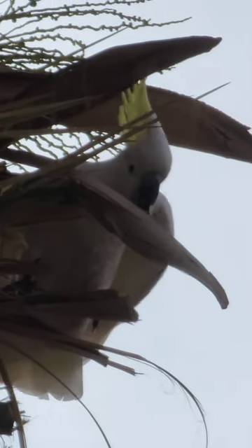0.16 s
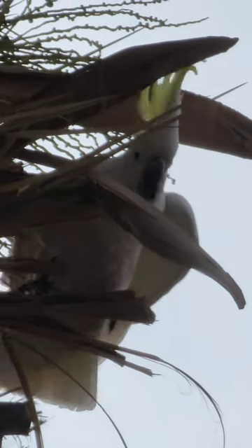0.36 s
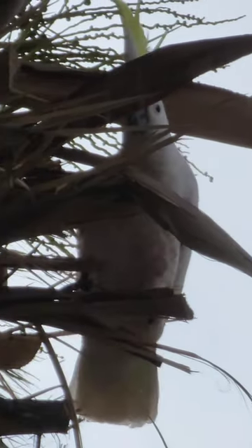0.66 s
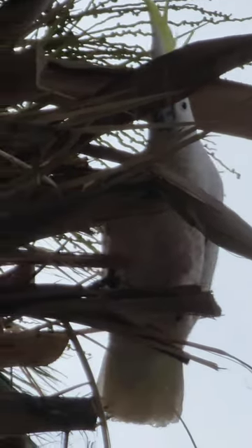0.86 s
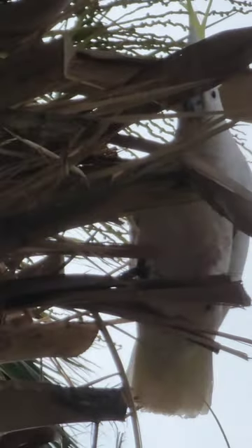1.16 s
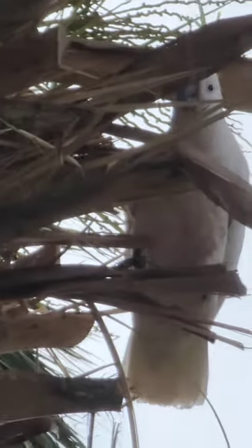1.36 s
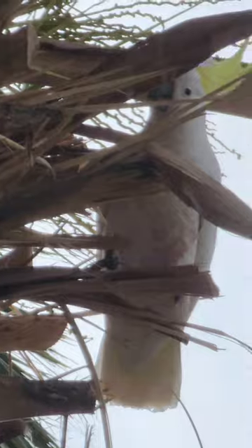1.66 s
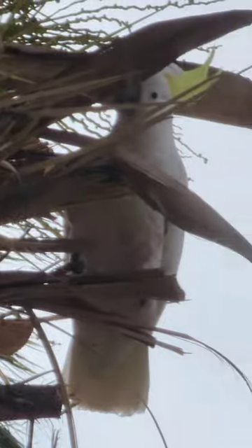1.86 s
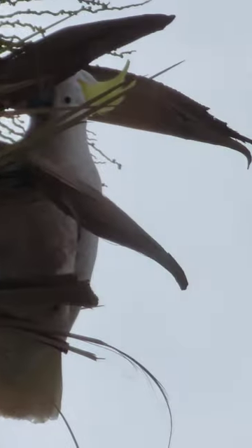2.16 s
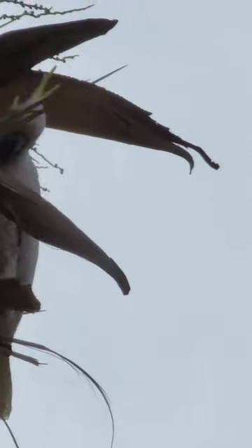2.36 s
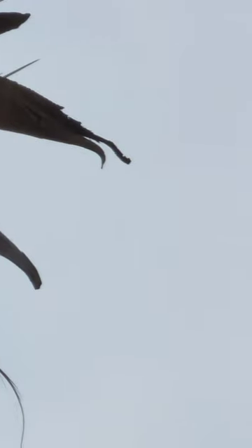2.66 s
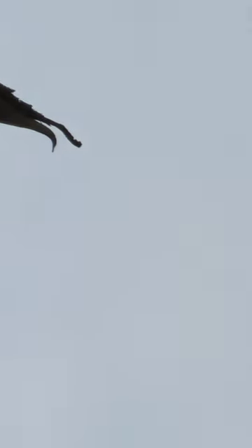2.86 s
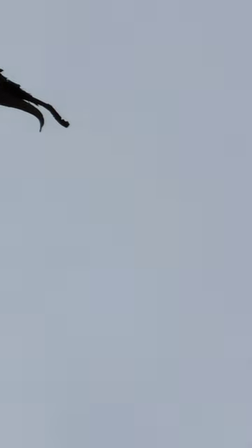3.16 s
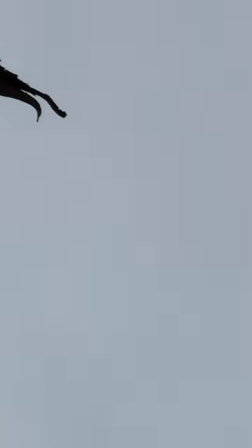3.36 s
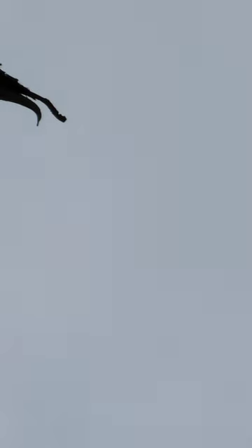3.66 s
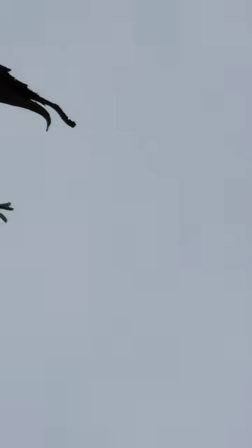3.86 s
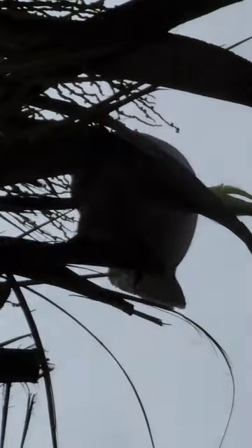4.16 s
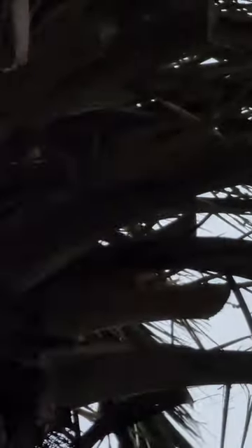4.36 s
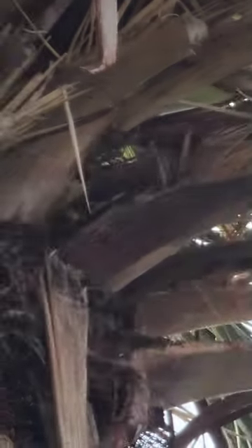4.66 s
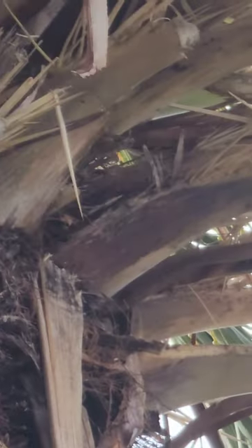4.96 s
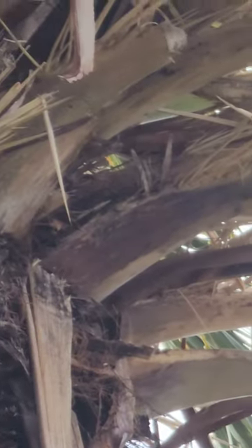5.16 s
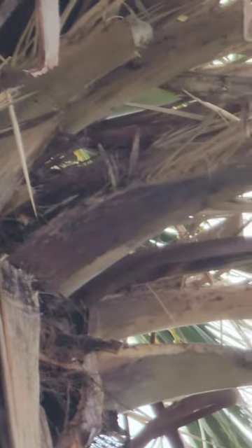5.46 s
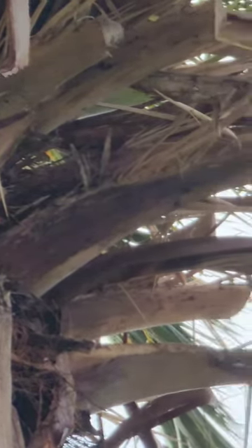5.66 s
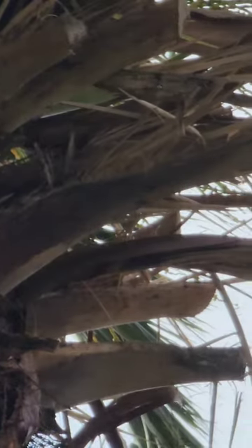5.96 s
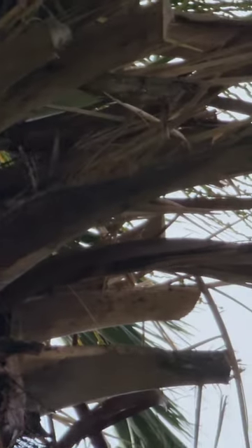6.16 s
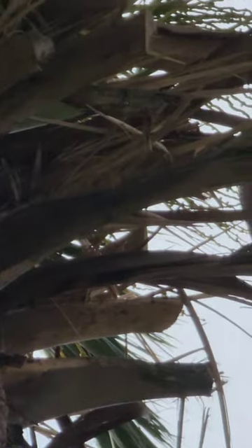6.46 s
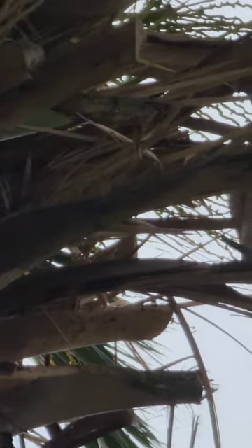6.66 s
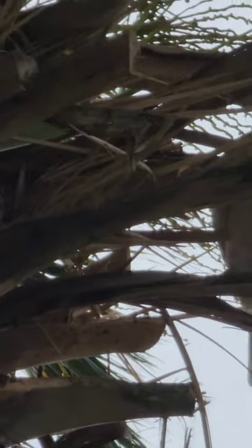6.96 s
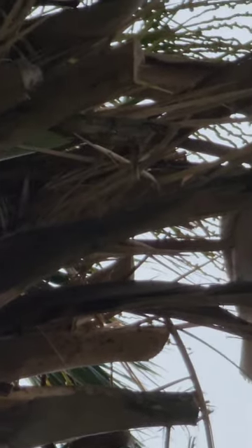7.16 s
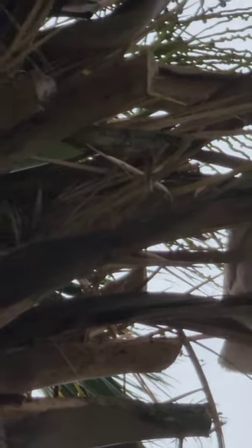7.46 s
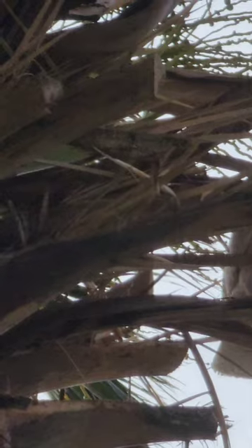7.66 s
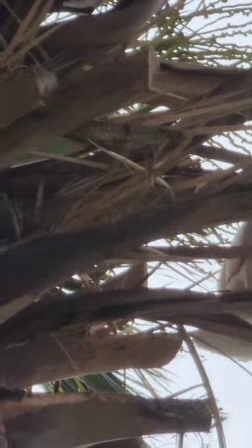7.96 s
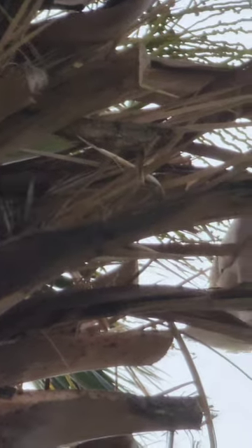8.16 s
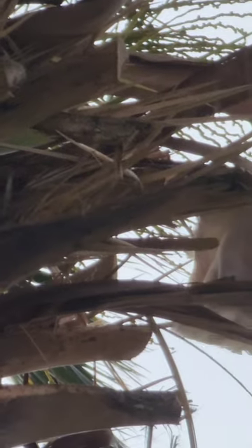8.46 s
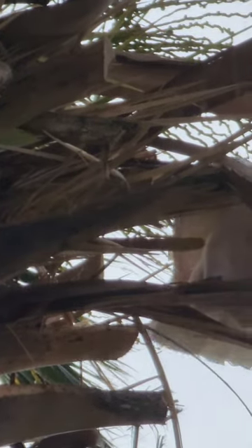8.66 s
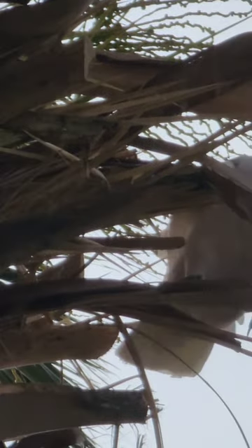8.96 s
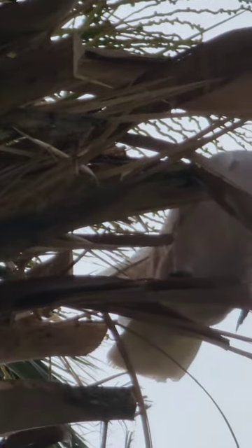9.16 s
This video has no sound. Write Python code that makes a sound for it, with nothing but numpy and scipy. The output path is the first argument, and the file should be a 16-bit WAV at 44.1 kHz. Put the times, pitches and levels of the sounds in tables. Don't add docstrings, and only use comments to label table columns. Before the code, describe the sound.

Several cockatoos give loud, harsh, rasping screeches one after another outdoors, with fainter answering calls further off over low wind rumble and distant traffic.

```python
import sys
import numpy as np
from scipy import signal
from scipy.fft import rfft, irfft, next_fast_len
from scipy.io import wavfile
from scipy.ndimage import uniform_filter1d

SR = 44100
rng = np.random.default_rng(int(sys.argv[2]) if len(sys.argv) > 2 else 0)


def invert_db(x):
    u = np.asarray(x, float) / 20
    return 10 ** u


def waveform_to_disk(signal):
    frames = np.transpose(np.atleast_2d(signal))
    scaled = np.clip(frames, -1, 1) * 32767
    samples = np.round(scaled).astype(np.int16)
    wavfile.write(sys.argv[1], SR, samples)


N = 411012
TOP_HZ = 15400

# start in seconds, length in seconds,
# phase scatter in radians (small is a clean whistle).
NEAR_CALM_SPELLS = [(.14, .085, .08), (3.63, .12, .55), (3.78, .17, .7), (3.99, .16, .15), (4.43, .05, .35),
                    (4.49, .06, .5), (4.56, .048, .05), (7.24, .21, .44), (8.49, .08, .5),
                    (8.58, .062, .05)]
# start in seconds, length in seconds, level in dB,
# swell in seconds, fade in seconds.
NEAR_SCREECHES = [
    (.04, 0.58, -12, 0.08, 0.051),
    (4.425, 0.61, -11.5, .03, 0.076),
    (8.46, 0.66, -11.5, 0.059, 0.069),
]
# time in seconds, pitch in Hz.
NEAR_GLIDES = [
    [(.04, 960.6), (.14, 1008), (.235, 1110), (.3, 1149), (.6, 1140)],
    [(4.42, 990.4), (4.52, 1047), (4.6, 1098), (4.7, 1110), (5.0, 1188)],
    [(8.47, 1040), (8.57, 1045), (8.645, 1147), (9.1, 1139)],
]
# frequency in Hz, density in dB per Hz.
NEAR_TRACT = [(290, -59.5), (500, -18), (801, -16.5), (873, -21.5), (1100, -12.5), (1400, -15), (1840, -13),
              (2240, -10), (3450, -15), (4100, -15.5), (5400, -12), (6300, -17.5), (7700, -17.5),
              (10100, -31.5), (15200, -30.5)]


def nearest_bird():
    return screeches(NEAR_SCREECHES, NEAR_GLIDES, NEAR_CALM_SPELLS, NEAR_TRACT, rasp_rad=.67, ring=0.45,
                     beak_db=-0.5, beak_rise_db=11.5, low_db=-15.5, hiss_db=-11)


# start in seconds, length in seconds, level in dB,
# swell in seconds, fade in seconds.
MATE_SCREECHES = [
    (7.18, .63, -11, 0.062, 0.071),
]
# time in seconds, pitch in Hz.
MATE_GLIDES = [
    [(7.2, 1050), (7.42, 1125), (7.47, 1163), (7.6, 1199), (7.72, 1161), (7.8, 1050)],
]


def darker_mate():
    return screeches(MATE_SCREECHES, MATE_GLIDES, NEAR_CALM_SPELLS, NEAR_TRACT, rasp_rad=.67, ring=0.55,
                     beak_db=-7, beak_rise_db=10.5, low_db=-18, hiss_db=-14.5)


# start in seconds, length in seconds, level in dB,
# swell in seconds, fade in seconds.
DEEP_SCREECHES = [
    (3.575, 0.566, -11.5, 0.22, 0.097),
]
# time in seconds, pitch in Hz.
DEEP_GLIDES = [
    [(3.62, 800), (3.72, 916), (3.82, 934.6), (3.9, 1000), (3.97, 1002), (4.068, 900), (4.13, 785)],
]
# frequency in Hz, density in dB per Hz.
DEEP_TRACT = [(290, -47.5), (500, -10), (746, -11), (1080, -1.5), (1360, -7), (1550, -9), (1970, -7),
              (2990, -7.5), (4210, -16), (4860, -9.5), (9780, -28.5), (14600, -34.5), (15200, -52.5)]


def deep_neighbour():
    return screeches(DEEP_SCREECHES, DEEP_GLIDES, NEAR_CALM_SPELLS, DEEP_TRACT, rasp_rad=.92, ring=3.2,
                     beak_db=-6, beak_rise_db=8, low_db=-17, hiss_db=-10)


# start in seconds, length in seconds, level in dB,
# swell in seconds, fade in seconds.
HOARSE_SCREECHES = [
    (2.55, 0.55, -13, 0.19, 0.068),
]
# time in seconds, pitch in Hz.
HOARSE_GLIDES = [
    [(2.6, 992.4), (3.1, 1082)],
]


def hoarse_bird():
    return screeches(HOARSE_SCREECHES, HOARSE_GLIDES, NEAR_CALM_SPELLS, DEEP_TRACT, rasp_rad=.92, ring=2.1,
                     beak_db=-2, beak_rise_db=3, low_db=-15.5, hiss_db=-17)


# start in seconds, length in seconds, start pitch in Hz,
# end pitch in Hz, level in dB.
VOICE_CATCHES = [
    (7.17, 0.18, 980, 2000, -18.5),
    (7.22, 0.082, 1560, 1480, -17),
    (7.19, 0.13, 2600, 2200, -12),
    (7.725, 0.03, 640, 590, -23.5),
    (7.72, 0.081, 2400, 2200, -13.5),
    (7.26, .19, 1080, 1130, -18.5),
    (3.62, 0.048, 2000, 1300, -21),
]


def voice_catches():
    return whistles(VOICE_CATCHES, .025)


# start in seconds, length in seconds, level in dB,
# swell in seconds, fade in seconds.
FAR_SCREECHES = [(0, .09, -27.5, 0.0033, 0.027), (.56, .62, -26.5, 0.056, 0.22),
                 (1.13, 0.52, -37.5, 0.085, .45), (2.02, 0.64, -59, 0.066, 0.069),
                 (3.23, 0.33, -47, 0.085, .15), (4.08, .4, -28, 0.034, .04), (6.3, 0.347, -36, 0.21, 0.17),
                 (6.66, .14, -41, 0.057, .04), (6.76, .26, -41.5, .04, 0.036),
                 (6.93, 0.35, -39, 0.087, 0.0384), (7.9, .62, -26, .4, .05)]
# time in seconds, pitch in Hz.
FAR_GLIDES = [
    [(0, 1040), (.09, 970)],
    [(.6, 1110), (1.15, 1000)],
    [(1.15, 1000), (1.4, 1100)],
    [(2.05, 1000), (2.5, 1050)],
    [(3.27, 787), (3.45, 745)],
    [(4.1, 950), (4.45, 1000)],
    [(6.35, 1440), (6.6, 1490)],
    [(6.68, 1000), (6.78, 1030)],
    [(6.77, 1370), (7.0, 1350)],
    [(7.0, 1250), (7.15, 1140)],
    [(7.95, 1030), (8.12, 1090)],
]
# start in seconds, length in seconds,
# phase scatter in radians.
FAR_CALM_SPELLS = [(.62, .3, .7), (1.19, .5, .55), (6.76, .23, .25), (7.03, .2, .65), (7.97, .16, .45),
                   (8.15, .3, .62)]
# frequency in Hz, density in dB per Hz.
FAR_TRACT = [(350, -66.5), (600, -18.5), (715, -11), (925, -18), (1090, -15), (1660, -16.5), (2230, -12.5),
             (2960, -0.5), (3780, -13.5), (5600, -20), (15200, -42.5)]


def far_flock():
    return screeches(FAR_SCREECHES, FAR_GLIDES, FAR_CALM_SPELLS, FAR_TRACT, rasp_rad=.8, ring=0.36,
                     beak_db=5, beak_rise_db=-0.5, low_db=-14, hiss_db=-21)


# lower edge in Hz, upper edge in Hz.
VOICE_BANDS = ((1400, 2400), (450, 1400), (2400, 3700), (3700, 9200), (9200, 15300))


def screeches(calls, glides, calm_spells, tract, rasp_rad, ring, beak_db, beak_rise_db, low_db, hiss_db):
    tiring_rad, calm_edge_s, low_joins_s = .17, .013, .11
    out = np.zeros(N)
    for (start, length, db, swell, fade), glide in zip(calls, glides):
        at = np.arange(int(start * SR), min(int((start + length) * SR), N))
        t, count = at / SR, len(at)
        along = (t - start) / length

        full = rasp_rad + tiring_rad * along
        chaos = full.copy()
        for s, span, rad in calm_spells:
            inside_s = np.minimum(t - s, s + span - t)
            chaos += (rad - chaos) * np.clip(1 + inside_s / calm_edge_s, 0, 1)
        clean = 1 - chaos / full
        rising = np.clip(1 - (t - start) / swell, 0, 1)
        dying = np.clip(1 - (start + length - t) / fade, 0, 1)

        wander = .045 * chaos ** 2 * np.tanh(walk(28, count))
        hz = np.interp(t, *np.transpose(glide)) * (1 + wander)
        voice = shape(syrinx(hz, chaos, ring), tract)
        throat, low, beak, rasp, hiss = (steady(band(voice, *edges)) for edges in VOICE_BANDS)

        gape_db = beak_db + beak_rise_db * along - 7 * rising - 11 * clean + 3 * dying
        gape_db += 4 * chaos * np.tanh(walk(22, count))
        beak_gain, rasp_gain = invert_db(gape_db), invert_db(-6 + 0.8 * gape_db)
        rasp = rasp + invert_db(hiss_db - 8.5 * clean) * hiss
        voice = throat + beak_gain * beak + rasp_gain * rasp
        voice /= np.sqrt(1 + beak_gain ** 2 + rasp_gain ** 2)

        late_db = -11 * np.clip(1 - (t - start) / low_joins_s, 0, 1) ** .5
        flutter_db = 5 * chaos * np.tanh(walk(20, count))
        voice += invert_db(low_db + 6.5 * clean ** 2 + late_db + flutter_db) * low

        level_db = db - 24 * rising ** 2 - 25 * dying ** 1.12 + 1.43 * clean
        ends = np.clip(4 - 4 * np.maximum(rising, dying), 0, 1)
        out[at] += ends * invert_db(level_db) * voice
    return out


def syrinx(hz, chaos, ring):
    count = len(hz)
    cycle = 2 * np.pi * np.cumsum(hz * (1 + .025 * chaos * walk(80, count))) / SR
    cycle += 1.2 * chaos ** 2 * walk(260, count)
    phase = cycle + 0.91 * chaos * walk(1500, count)
    order = np.clip(1 - chaos, 0, 1)
    puffs = np.zeros(count)
    for k in range(1, 20):
        puffs += np.cos(k * phase) * np.exp(-.2 * order * k) * (k * hz < TOP_HZ)
    puffs += ring * order * np.cos(2 * cycle) * invert_db(2.4 * chaos * walk(120, count))
    breath = .6 * chaos * rng.standard_normal(count)
    return puffs * invert_db(1.37 * chaos * walk(300, count)) + breath


# start in seconds, length in
# seconds, start pitch in Hz, end pitch in Hz, level in dB.
TONES_AND_CHIRPS = [(1.2, 0.18, 2040, 2220, -42), (.98, .2, 1920, 1900, -40), (1.36, 0.17, 3320, 3230, -48),
                    (1.98, 0.23, 4330, 4280, -60.5), (2.42, 0.092, 5400, 5360, -52.5),
                    (2.44, .05, 8100, 8100, -69), (2.3, .08, 4730, 4760, -63), (3.24, .14, 1503, 1355, -39),
                    (3.25, 0.16, 780, 674, -43.5), (3.28, 0.23, 5300, 5300, -58.5),
                    (3.33, .13, 3850, 3750, -54.5), (3.32, 0.093, 3130, 2890, -35.5),
                    (5.69, 0.12, 4370, 4300, -69), (5.81, .05, 4820, 4950, -68.5),
                    (6.04, 0.075, 3800, 3800, -64), (6.38, .08, 1450, 1500, -44),
                    (6.655, 0.116, 3060, 3027, -33), (6.75, 0.24, 1360, 1360, -32.5),
                    (6.81, 0.15, 5400, 5450, -51), (7.99, .14, 2060, 2200, -34), (8.15, .3, 2170, 2150, -37.5),
                    (7.05, .15, 2394, 2250, -40)]
# start in seconds, length in seconds, start pitch in Hz, end pitch in Hz,
# level in dB.
SCRATCHY_TICKS = [
    (2.05, 0.035, 6350, 5600, -56),
    (2.295, .04, 6300, 6160, -53.5),
    (2.47, 0.12, 6300, 6200, -55),
    (6.268, .04, 6200, 6000, -51),
    (6.71, 0.071, 2250, 1890, -32),
]


def far_tones_and_ticks():
    return whistles(TONES_AND_CHIRPS, .012) + whistles(SCRATCHY_TICKS, .1)


def whistles(table, wobble):
    out = np.zeros(N)
    for s, length, from_hz, to_hz, db in table:
        count = int(length * SR)
        glide = from_hz + (to_hz - from_hz) * np.linspace(0, 1, count) ** 2
        hz = glide * (1 + wobble * walk(700, count))
        swell = invert_db(db + 2 * walk(80, count)) * signal.windows.tukey(count, .6)
        first = int(s * SR)
        out[first:first + count] += swell * np.sin(2 * np.pi * np.cumsum(hz) / SR)
    return out


# left delay in seconds, right delay in seconds, gain as a ratio.
CLOSE_ECHOES = [
    (.00627, .00627, -.4),
    (.00196, .00126, .25),
    (.00158, .00158, -.2),
    (.00255, .00255, .15),
    (.00831, .00829, .2),
    (.00373, .01149, -.15),
]


def grove(x, pan_db, echo_share, frond_db, tail_db, t60_s):
    answer = scatter(frond_db, 0.1, 0.00063, 1900, 0.15)
    answer += scatter(tail_db, t60_s, 0.0068, 500, 0.6)
    answer[[0, 1], [0, 1]] += 1
    for left_s, right_s, gain in CLOSE_ECHOES:
        answer[[0, 1], [int(left_s * SR), int(right_s * SR)]] += echo_share * gain
    pan = invert_db(np.array([[pan_db], [-pan_db]]) / 2)
    answer *= pan / np.sqrt(np.sum(answer ** 2, axis=1, keepdims=True))
    return signal.fftconvolve(x[None], answer, axes=1)[:, :N]


def scatter(db, t60_s, rise_s, apart_hz, dull):
    t = np.arange(SR) / SR
    decay = invert_db(-60 * t / t60_s) * (1 - np.exp(-t / rise_s))
    mid, side = rng.standard_normal((2, SR)) * decay
    side = signal.lfilter(*signal.butter(1, apart_hz, "high", fs=SR), side)
    cloud = signal.lfilter([1], [1, -np.clip(dull, 0, .9)], [mid + side, mid - side])
    return invert_db(db) * cloud / np.sqrt(np.mean(np.sum(cloud ** 2, axis=1)))


# time in seconds, rumble level in dB.
RUMBLE_LEVELS = [(0.0, -36.5), (4.38, -35.5), (4.78, -44), (4.91, -35.5), (7.53, -40), (7.74, -45),
                 (7.79, -37), (8.62, -31.5), (8.77, -42.5), (9.22, -32.5), (9.27, -46), (9.32, -37)]
# frequency in Hz, density in dB per Hz.
AIR_SPECTRUM = [(11, -43.5), (18, -36.5), (48, 6.5), (87, -3), (123, -3.5), (198, -21), (302, -21),
                (546, -30.5), (934, -26.5), (1470, -26.5), (2300, -32.5), (2730, -45.5), (3140, -43.5),
                (7120, -74), (15200, -83)]
# frequency in Hz, side minus mid in dB.
AIR_WIDTH = [(60, -17.5), (110, -18), (200, -21), (380, -8.5), (690, -7), (1280, -1.5), (2360, -0.5),
             (4350, 2), (8020, -5.5), (14800, -3)]


def wind_and_traffic():
    mid = shape(rng.standard_normal(N), AIR_SPECTRUM)
    side = shape(shape(rng.standard_normal(N), AIR_SPECTRUM), AIR_WIDTH)
    pair = np.array([mid + side, mid - side])
    rumble, hiss = band(pair, 15, 190), band(pair, 190, 15300)
    rumble_db = np.interp(np.arange(N) / SR, *np.transpose(RUMBLE_LEVELS)) + 2.2 * walk(5.1, N)
    traffic_db = -43 + 1.0 * walk(1.0, N)
    return rumble / rumble.std() * invert_db(rumble_db) + hiss / hiss.std() * invert_db(traffic_db)


def shape(x, table):
    size = next_fast_len(len(x))
    hz, db = np.transpose(table)
    bins_hz = np.arange(size // 2 + 1) * SR / size
    gain = invert_db(np.interp(np.log(bins_hz + 1), np.log(hz), db))
    return irfft(rfft(x, size) * gain, size)[:len(x)]


def band(x, lo_hz, hi_hz):
    return signal.sosfilt(signal.butter(4, [lo_hz, hi_hz], "bandpass", fs=SR, output="sos"), x)


def steady(x, span_s=.03):
    return x / np.sqrt(uniform_filter1d(x ** 2, int(span_s * SR)) + 1e-12)


def walk(rate, count):
    hold = max(int(SR / rate), 1)
    x = np.repeat(rng.standard_normal(count // hold + 1), hold)
    x = uniform_filter1d(uniform_filter1d(x, hold), hold)[:count]
    return x / x.std()


def scene():
    near = nearest_bird() + hoarse_bird() + deep_neighbour() + darker_mate() + voice_catches()
    far = far_flock() + far_tones_and_ticks()
    near = grove(near, pan_db=1.0, echo_share=0.93, frond_db=0.85, tail_db=-11, t60_s=0.53)
    far = grove(far, pan_db=2.2, echo_share=0.14, frond_db=0.27, tail_db=-1.3, t60_s=0.6)
    return near + far + wind_and_traffic()


# frequency in Hz, gain in dB.
PORT_RESPONSE = [(8300, 0), (8900, -6.5), (10000, -5), (11200, 2.5), (12500, 5), (14300, 0.5), (15200, 4.5)]


def microphone(dry):
    return np.array([shape(side, PORT_RESPONSE) for side in dry])


def band_limit(x):
    return signal.sosfilt(signal.butter(12, 15390, fs=SR, output="sos"), x)


def record(dry):
    soft = np.clip(np.tanh(0.94 * microphone(dry)) / 0.82, -1, 1)
    mix = signal.sosfilt(signal.ellip(8, .2, 70, TOP_HZ, fs=SR, output="sos"), soft)
    return band_limit(mix)


dry = scene()
out = record(dry)
waveform_to_disk(out)
```